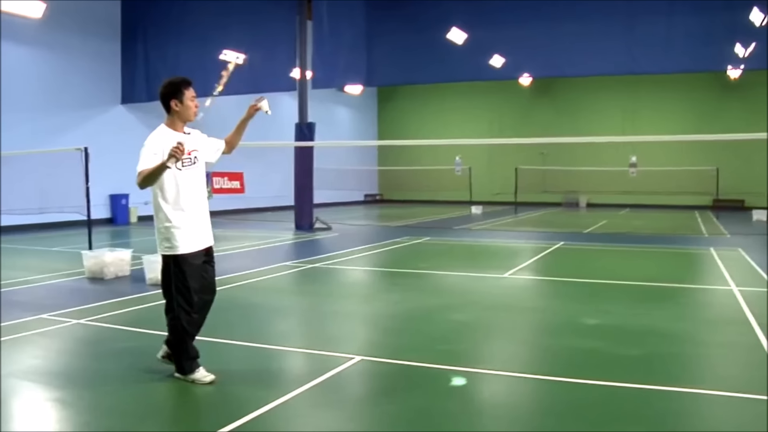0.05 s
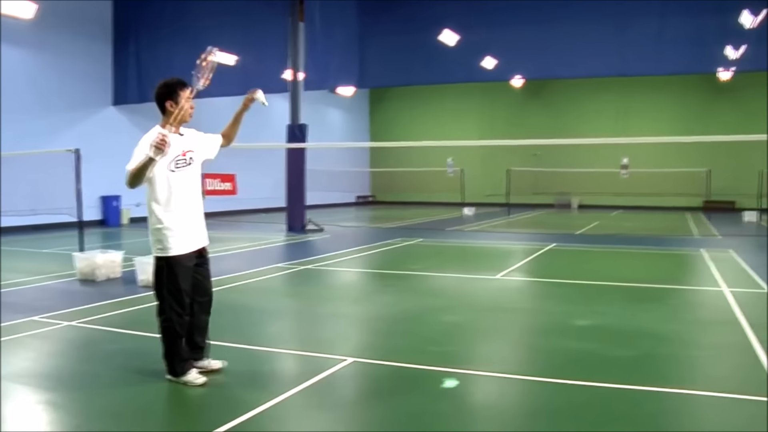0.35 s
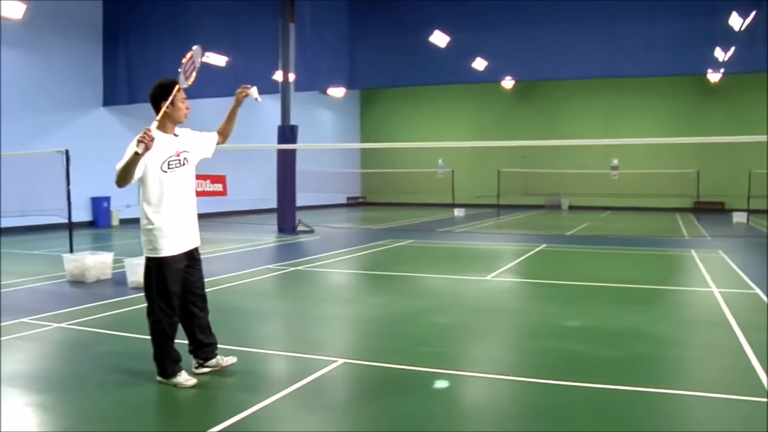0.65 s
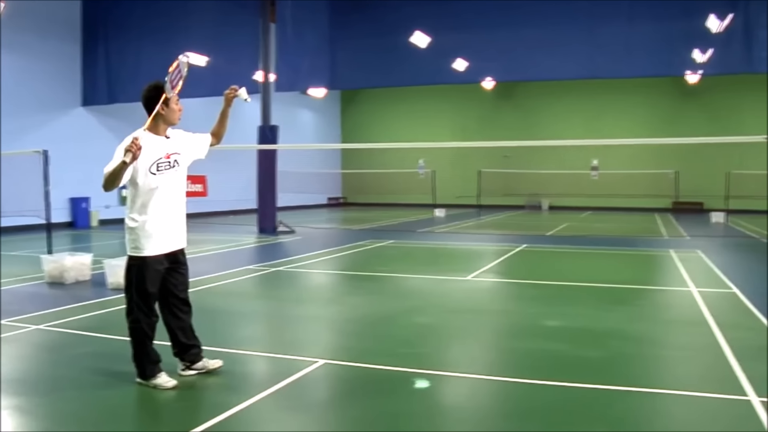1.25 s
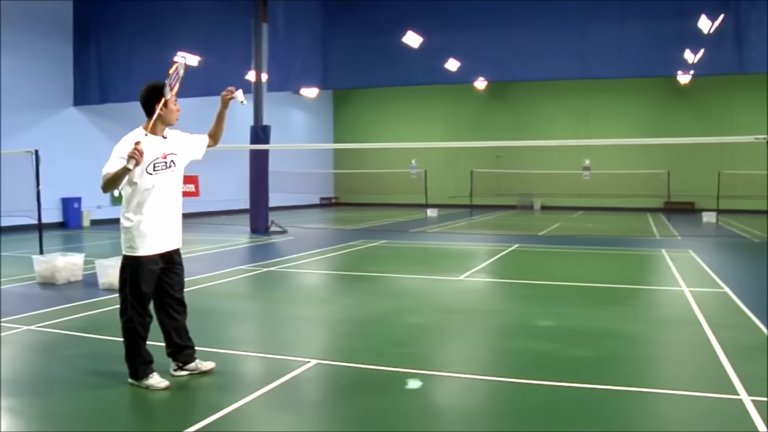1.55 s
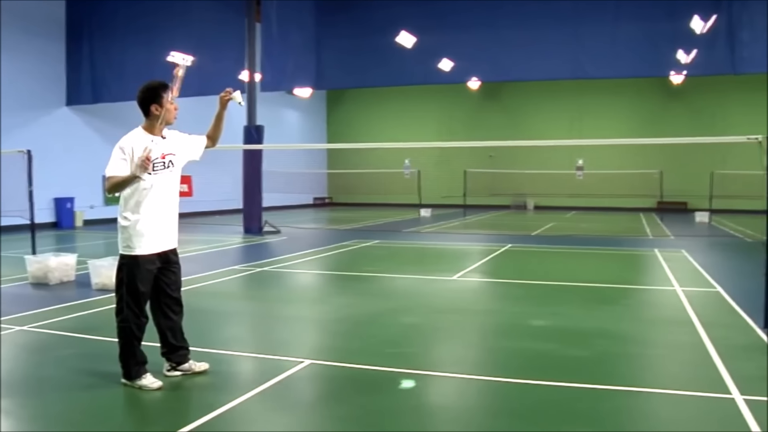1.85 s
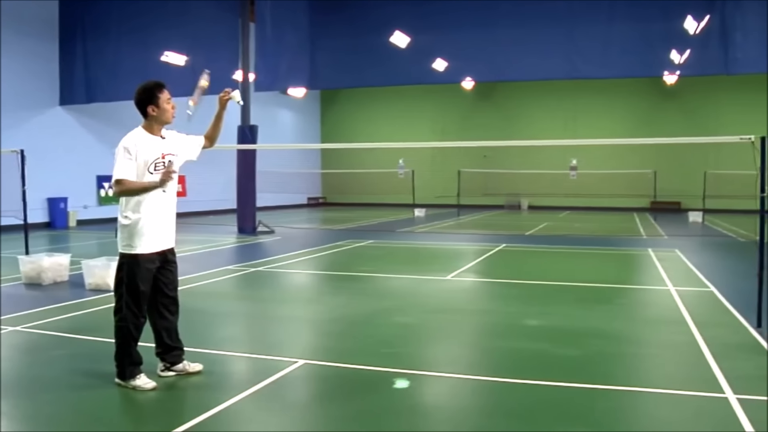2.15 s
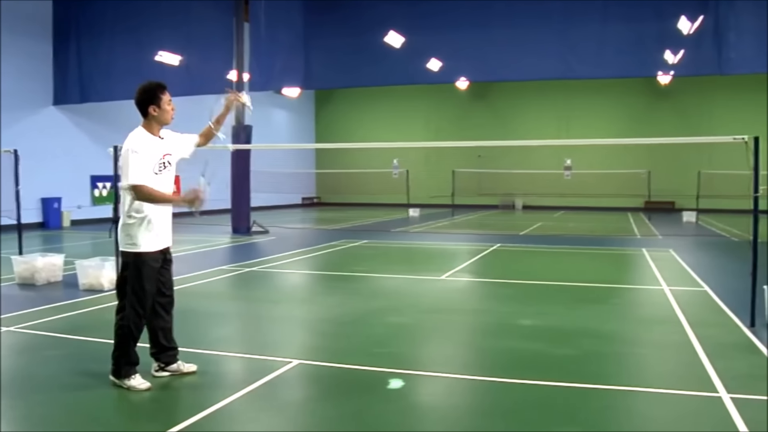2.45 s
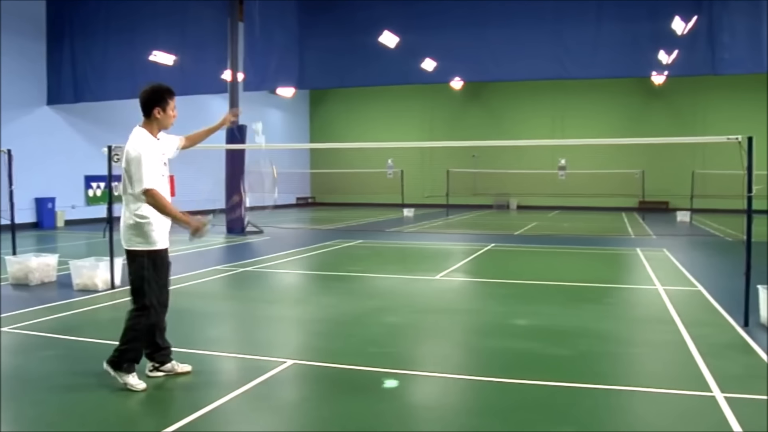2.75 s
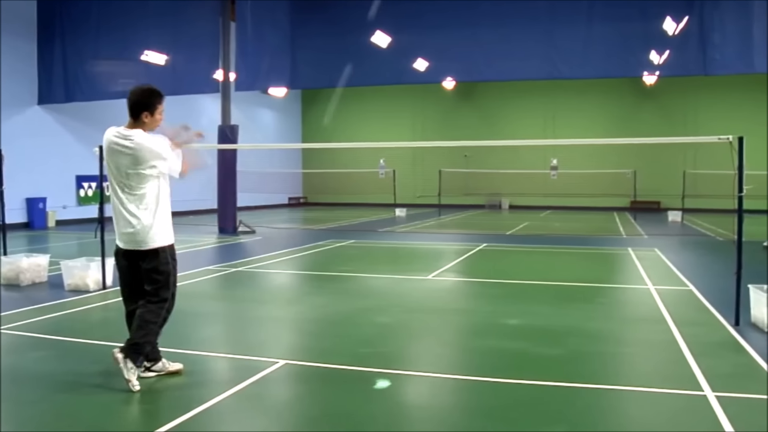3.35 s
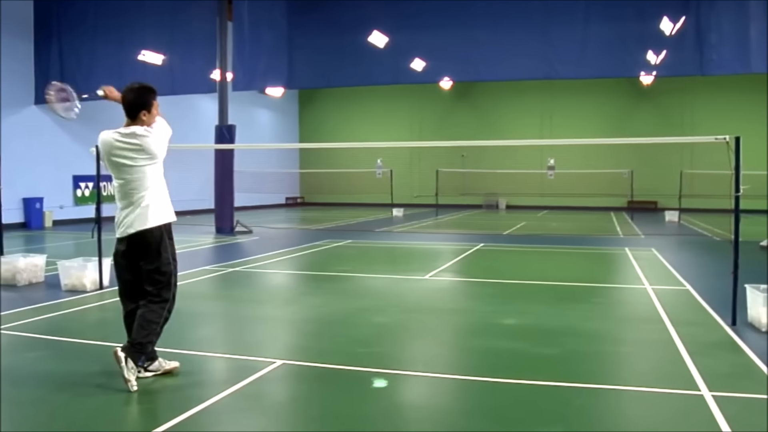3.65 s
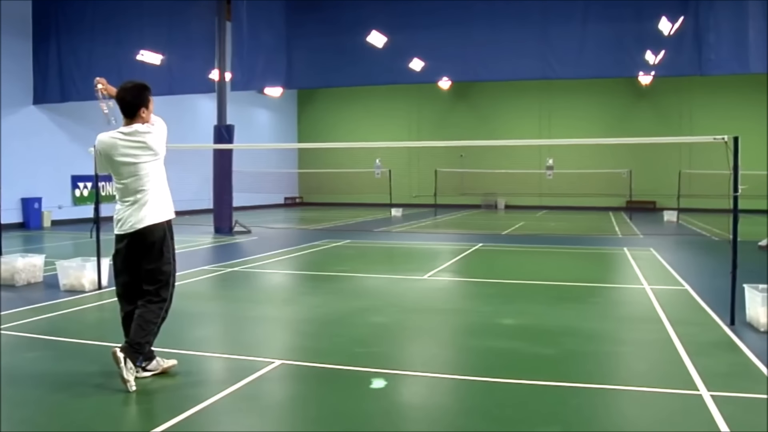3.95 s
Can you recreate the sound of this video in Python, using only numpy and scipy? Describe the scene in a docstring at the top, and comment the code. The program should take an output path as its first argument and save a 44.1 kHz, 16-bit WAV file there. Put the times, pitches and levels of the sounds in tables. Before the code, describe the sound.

A badminton smash cracks sharply and echoes through a large sports hall.

```python
"""A badminton smash in a large sports hall: cork cracks on the string bed, which rings and thumps.
The racket whooshes into the hit; floor and walls return it as slaps and a long, darkening tail.
Before it, soles scuff and tap and clothes rustle, among faint high chirps and ticks.
Ventilation rumbles throughout, under a wash of hall noise that slowly fades."""
import sys
import numpy as np
from scipy import signal
from scipy.fft import rfft, irfft
from scipy.io import wavfile
from scipy.ndimage import uniform_filter1d

SR = 44100
rng = np.random.default_rng(int(sys.argv[2]) if len(sys.argv) > 2 else 0)


def transcribe(u):
    """Save the signal u as a 16-bit wav file named by the first command-line argument.

    u: samples, shape (n,) or (channels, n), limited to [-1, 1]; the rate is SR.
    q: integer samples, one column per channel.
    """
    v = np.clip(np.atleast_2d(u).T, -1, 1)
    q = np.round(v * 32767).astype(np.int16)
    wavfile.write(sys.argv[1], SR, q)


N = 176400
TIME_S, BIN_HZ = np.arange(N) / SR, np.fft.rfftfreq(N, 1 / SR)
HIT_S = 3.3495


def amp(db):
    """Decibels to gain."""
    return 10 ** (np.asarray(db) / 20)


def unit_rms(x):
    """Scale to an rms of one."""
    return x / np.sqrt(np.mean(x ** 2) + 1e-20)


def lookup(table, hz):
    """Interpolate on a log-frequency axis."""
    freq_hz, value = np.transpose(table)
    return np.interp(np.log(hz + 1), np.log(freq_hz + 1), value)


def noise(spectrum):
    """Steady coloured noise, unit rms."""
    return unit_rms(irfft(rfft(rng.standard_normal(N)) * amp(lookup(spectrum, BIN_HZ)), N))


def band(hz, width_hz):
    """Noise in one Gaussian resonance, unit rms."""
    resonance = np.exp(-.5 * ((BIN_HZ - hz) / width_hz) ** 2)
    return unit_rms(irfft(rfft(rng.standard_normal(N)) * resonance, N))


def drift(shape, size):
    """Smooth random motion along the last axis, unit rms."""
    return unit_rms(uniform_filter1d(uniform_filter1d(rng.standard_normal(shape), size), size))


def since(start_s):
    """Seconds after start_s, zero before."""
    return np.maximum(TIME_S - start_s, 0)


def ramp(start_s, length_s):
    """Linear rise from 0 to 1, then held."""
    return np.minimum(since(start_s) / length_s, 1)


def arches(events):
    """Envelope with one rounded swell per event."""
    return sum(amp(db) * np.sqrt(abs(np.sin(np.pi * ramp(start_s, length_s))))
               for start_s, length_s, db in events)


def delayed(x, delay_s):
    """Shift later, keeping the length."""
    return np.pad(x, (round(delay_s * SR), 0))[:N]


def tint(x, spectrum):
    """Impose a magnitude spectrum, keep the phase; unit energy."""
    phase = np.angle(rfft(x))
    tinted = irfft(np.exp(1j * phase) * amp(lookup(spectrum, BIN_HZ)), N)
    return tinted / np.linalg.norm(tinted)


# Ventilation rumble: freq_hz, gain_db
VENT_SPECTRUM = [(12, -5), (30, -6.5), (42, 3), (62, 1), (85, 0), (115, 1), (165, -1.5), (220, -1),
                 (290, -8.5), (400, -10.5), (600, -21), (850, -17.5), (1300, -37.5), (2000, -38),
                 (4000, -42.5), (7000, -48), (10300, -49), (11300, -65), (15500, -75)]
def ventilation(level_db=-43, flutter_db=0.6):
    """Air rumbles, wavering slightly in patches of time and frequency."""
    _, _, frames = signal.stft(noise(VENT_SPECTRUM), SR, nperseg=2048)
    patches = unit_rms(uniform_filter1d(drift(frames.shape, size=10), size=6, axis=0))
    _, rumble = signal.istft(frames * amp(flutter_db * patches), SR, nperseg=2048)
    return amp(level_db) * unit_rms(rumble[:N])


# Low-mid room noise contour: time_s, level_db
SWELL_CONTOUR = [(0, -43), (.55, -44), (1.05, -45), (1.35, -46.5), (1.8, -50), (2.4, -55.5), (2.851, -48),
                 (3.3, -53)]
# Low-mid room noise: freq_hz, gain_db
SWELL_SPECTRUM = [(60, 1), (150, -5.5), (280, 8), (350, 1), (450, -13.5), (700, -8), (1100, -23.5),
                  (2500, -63)]
# Lingering hall noise: freq_hz, gain_db
WASH_SPECTRUM = [(100, 3), (400, 5), (750, -3.5), (1150, 1.5), (1800, -10.5), (2600, -26.5), (3800, -20.5),
                 (6000, -44), (11000, -47)]
def hall_noise(wash_db=-54, fade_db_per_s=3):
    """Low-mid noise sinks and swells while a broader wash fades."""
    swell = amp(np.interp(TIME_S, *np.transpose(SWELL_CONTOUR))) * noise(SWELL_SPECTRUM)
    wash = amp(wash_db - fade_db_per_s * TIME_S) * noise(WASH_SPECTRUM)
    return swell + wash


# Duct hum: pitch_hz, width_hz, level_db
DUCT_DRONES = [(29, 3.3, -54), (112.6, 2.6, -56.5), (148.6, 1.55, -55.5), (220.5, 6.3, -51),
               (918, 9.9, -72)]
def ducts():
    """Air ducts hum in narrow, wavering bands."""
    return sum(amp(db) * band(hz, width_hz) for hz, width_hz, db in DUCT_DRONES)


WALLS_S = 0.093
# Hall decay: freq_hz, t60_s
HALL_DECAY = [(100, 2.5), (500, 7.2), (1300, 3.94), (3000, 2.62), (5000, 1.43), (8000, 0.86), (10500, 0.85),
              (12000, 2.2), (15000, 2.5)]
def hall_response(spectrum, early_db=-7.5, build_s=0.013):
    """Weak early scatter, then the full tail once the walls answer; unit energy."""
    hz, t, frames = signal.stft(noise(spectrum), SR, nperseg=512)
    decay = amp(-60 * t / lookup(HALL_DECAY, hz)[:, None])
    _, tail = signal.istft(frames * decay, SR, nperseg=512)
    early = amp(early_db) * ramp(0, build_s)
    late = (1 - amp(early_db)) * ramp(WALLS_S, build_s)
    response = tail[:N] * (early + late)
    return response / np.linalg.norm(response)


# Hall reverberation: freq_hz, gain_db
REVERB_SPECTRUM = [(100, 10.5), (1000, -4), (4000, 0.5), (12000, -5)]
def reverb(send):
    """The hall prolongs and colours the sound sent into it."""
    return signal.fftconvolve(send, hall_response(REVERB_SPECTRUM))[:N]


# Clothing strokes: start_s, length_s, level_db
CLOTH_STROKES = [(0, 0.064, -64.5), (.08, 0.14, -70), (0.213, 0.18, -75), (0.567, 0.17, -69)]
# Cloth friction: freq_hz, gain_db
CLOTH_SPECTRUM = [(500, -15), (2000, -7), (3000, 1), (4200, 3), (5600, -10), (7800, -2), (10200, -14),
                  (11300, -30)]
def rustle(grain_db=4):
    """Cloth brushes cloth in short, crinkly swells."""
    friction = noise(CLOTH_SPECTRUM) * amp(grain_db * drift(N, size=160))
    return arches(CLOTH_STROKES) * unit_rms(friction)


# Shoe scuffs: start_s, length_s, level_db
SOLE_SCUFFS = [(0.464, 0.09, -63.5), (0.53, 0.24, -71.5), (0.748, .04, -64), (0.89, 0.037, -72),
               (2.557, 0.16, -72.5), (3.083, 0.11, -69.5), (3.174, 0.16, -72)]
# Sole friction: freq_hz, gain_db
SCUFF_SPECTRUM = [(200, -16), (1500, 6), (3200, 8), (4400, 8.5), (5600, 4), (7500, 8), (10000, -2),
                  (11300, -24), (15000, -26)]
def scuffs(grain_db=4.5):
    """Soles rub the court in short, grainy swells."""
    friction = noise(SCUFF_SPECTRUM) * amp(grain_db * drift(N, size=45))
    return arches(SOLE_SCUFFS) * unit_rms(friction)


# Light footfalls: start_s, level_db
FOOT_TAPS = [(1.294, -41), (1.329, -54), (1.359, -46.5), (1.429, -55.5)]
# Footfall knock: freq_hz, gain_db
TAP_SPECTRUM = [(100, -7), (450, 9.5), (750, 11.5), (1500, -7), (2400, -15), (3300, -22), (4400, -24),
                (7000, -23), (11000, -51)]
def taps(rise_s=0.001, t60_s=0.036):
    """Feet land with soft knocks that die at once."""
    envelope = sum(ramp(start_s, rise_s) * amp(db - 60 * since(start_s) / t60_s)
                   for start_s, db in FOOT_TAPS)
    return envelope * noise(TAP_SPECTRUM)


# Faint high chirps: start_s, length_s, pitch_hz, width_hz, level_db
FAINT_CHIRPS = [(1.286, 0.02, 3220, 260, -54.5), (1.315, .055, 3670, 480, -68),
                (1.415, 0.035, 3950, 330, -67), (1.968, 0.1, 2700, 520, -69)]
def faint_chirps(octave_db=-12):
    """Faint, brief, rough high chirps with a weak octave."""
    out = np.zeros(N)
    for start_s, length_s, hz, width_hz, db in FAINT_CHIRPS:
        tone = band(hz, width_hz) + amp(octave_db) * band(2 * hz, 2 * width_hz)
        out += amp(db) * np.sin(np.pi * ramp(start_s, length_s)) * tone
    return out


# Stance and grip ticks: start_s, level_db, t60_s
STANCE_TICKS = [(0.492, -57, .025), (.502, -57, .02), (0.5134, -53, .02), (.521, -56.5, 0.017),
                (.5636, -60, .015), (.6763, -61, .012), (.7721, -53, .012), (0.781, -48, 0.022),
                (.7945, -45, 0.011), (0.928, -52, .012)]
# Tick colour: freq_hz, gain_db
TICK_SPECTRUM = [(300, -18), (2200, -13.5), (3400, -1.5), (4400, 0), (5600, -5), (7400, 5), (8600, -5),
                 (9800, -3), (11200, -27), (15000, -24)]
def ticks():
    """Faint, bright ticks as the player shifts stance and grip."""
    envelope = sum((TIME_S > start_s) * amp(db - 60 * since(start_s) / t60_s)
                   for start_s, db, t60_s in STANCE_TICKS)
    return envelope * noise(TICK_SPECTRUM)


# Bands of the high tick: pitch_hz, width_hz, level_db
TICK_BANDS = [(3450, 300, -64), (4350, 490, -60), (7350, 620, -57.5), (9500, 420, -61.5)]
def high_tick(peak_s=2.538, spread_s=0.008):
    """A faint, high tick rings briefly in a few bands."""
    envelope = np.exp(-.5 * ((TIME_S - peak_s) / spread_s) ** 2)
    return envelope * sum(amp(db) * band(hz, width_hz) for hz, width_hz, db in TICK_BANDS)


# Smash radiated to all sides: freq_hz, gain_db
TAIL_SPECTRUM = [(60, -3.5), (130, -2.5), (230, 1.5), (350, -1), (440, 1.5), (510, 2.5), (580, -2.5),
                 (740, 0.5), (1000, -5), (1550, -4), (1800, -10.5), (2300, -16), (2750, -16), (3900, -12.5),
                 (5000, -15), (7000, -18), (9500, -24.5), (11200, -44), (15500, -48)]
# Hall resonances: pitch_hz, width_hz, level_db, t60_s
HALL_MODES = [(514, 20, -43.5, 3.6), (2730, 36, -52, 1.1)]
def smash_tail(energy_db=10.5, clump_db=1.5):
    """Echoes of the smash arrive in clumps; a few pitches ring on."""
    echoes = hall_response(TAIL_SPECTRUM) * amp(clump_db * drift(N, size=220))
    rings = sum(amp(db - 60 * since(WALLS_S) / t60_s) * band(hz, width_hz)
                for hz, width_hz, db, t60_s in HALL_MODES)
    tail = amp(energy_db) * echoes / np.linalg.norm(echoes) + ramp(0, WALLS_S) ** 2 * rings
    return delayed(tail, HIT_S)


# Far-wall returns: delay_s, relative_db, t60_s
WALL_RETURNS = [(0.075, -10, 0.18), (0.096, -19.5, 0.12), (.126, -15, 0.049), (0.166, -10.5, 0.11),
                (.262, -16, .05), (0.301, -10, 0.04), (0.464, -20, 0.04)]
# Wall return colour: freq_hz, gain_db
SLAP_SPECTRUM = [(80, 4.5), (250, 0.5), (700, 3), (1500, -4.5), (2200, -15), (3500, -8), (6000, -18.5),
                 (10000, -28), (11500, -58)]
def wall_slaps(gain_db=-15, rise_s=0.0025, air_db_per_s_per_khz=6.5):
    """Walls return the smash as smeared bursts, duller over longer paths."""
    out = np.zeros(N)
    for delay_s, db, t60_s in WALL_RETURNS:
        arrival_s = HIT_S + delay_s
        envelope = ramp(arrival_s, rise_s) * amp(db - 60 * since(arrival_s) / t60_s)
        air_loss = amp(-air_db_per_s_per_khz * delay_s * BIN_HZ / 1000)
        out += irfft(rfft(envelope * noise(SLAP_SPECTRUM)) * air_loss, N)
    return amp(gain_db) * out


# Air rushing past the racket: freq_hz, gain_db
WHOOSH_SPECTRUM = [(100, -24), (400, -2), (900, -16), (1700, -13), (3000, -15), (6000, -22), (10000, -33),
                   (11500, -48)]
def swing(peak_s=3.336, rise_s=0.0366, fall_s=0.035, slow_hz=262, fast_hz=325.4, waver=0.0496,
          shaft_db=-33, whoosh_db=-48):
    """Racket speed sets the loudness of the rushing air and the pitch of the shaft's tone."""
    t = TIME_S - peak_s
    speed = np.exp(-(t / np.where(t < 0, rise_s, fall_s)) ** 2)
    pitch_hz = (slow_hz + (fast_hz - slow_hz) * speed) * (1 + waver * drift(N, size=300))
    shaft_tone = np.sin(2 * np.pi * np.cumsum(pitch_hz) / SR)
    return speed * (amp(shaft_db) * shaft_tone + amp(whoosh_db) * noise(WHOOSH_SPECTRUM))


# String bed and frame modes: pitch_hz, relative_db, t60_s
RACKET_MODES = [(232, -8.5, 0.048), (353, -2.5, 0.047), (474, -2, 0.073), (586, -8.5, 0.061),
                (791, -7.5, 0.048), (965, -6.5, 0.053), (1335, -21, 0.027), (1572, -10.5, 0.074),
                (1960, -14.5, 0.058), (2137, -20, 0.066), (2434, -21, 0.09), (2710, -14, 0.057),
                (2915, -12, 0.033), (3190, -19, .045), (5800, -17, 0.039)]
def strings(gain_db=-10.5, contact_s=0.0028):
    """The cork pushes the string bed in; strings and frame ring briefly."""
    t = since(HIT_S)
    contact = np.sin(np.pi / 2 * ramp(HIT_S, contact_s)) ** 2
    ring = sum(amp(db - 60 * t / t60_s) * np.sin(2 * np.pi * hz * t) for hz, db, t60_s in RACKET_MODES)
    return amp(gain_db) * contact * ring


def thump(gain_db=-8.5, pitch_hz=470, delay_s=0.005, spread_s=0.001):
    """The string bed springs back and pushes the air for about one cycle."""
    t = TIME_S - HIT_S - delay_s
    envelope = np.exp(-.5 * (t / spread_s) ** 2)
    return amp(gain_db) * envelope * np.sin(2 * np.pi * pitch_hz * t)


# Cork and feather impact: freq_hz, gain_db
CRACK_SPECTRUM = [(60, 4), (150, 1), (500, 5), (800, -0.5), (1100, -1), (1450, 1.5), (2200, -10.5),
                  (2900, -3.5), (3700, -14.5), (4500, -12.5), (6000, -14.5), (7700, -16), (8600, -21.5),
                  (10300, -24.5), (11300, -43), (15500, -40)]
def crack(gain_db=-14.8, rise_s=0.0009, hold_s=0.0044, t60_s=0.026):
    """Cork and feathers snap against the strings in a dense burst of a few milliseconds."""
    envelope = ramp(HIT_S, rise_s) * amp(-60 * since(HIT_S + hold_s) / t60_s)
    snap = tint(rng.standard_normal(N) * envelope, CRACK_SPECTRUM)
    for _ in range(4):  # keeps the burst short as well as coloured
        snap = tint(snap * envelope ** .2, CRACK_SPECTRUM)
    return amp(gain_db) * np.linalg.norm(envelope) * snap * (TIME_S > HIT_S)


def scene(floor_db=-7, floor_delay_s=0.0078):
    """Background, footwork and smash with its floor bounce and hall echoes; mono."""
    background = ventilation() + hall_noise() + ducts()
    racket = strings() + swing()
    friction = scuffs() + rustle()
    knocks, chirps = taps(), faint_chirps()
    smash = racket + thump() + crack()
    floor_bounce = amp(floor_db) * delayed(thump() + crack(), floor_delay_s)
    send = amp(-12) * (racket + friction) + knocks + amp(-1.5) * chirps
    hall = reverb(send) + smash_tail() + wall_slaps()
    lead_in = friction + knocks + chirps + ticks() + high_tick()
    return (background + hall + lead_in + floor_bounce + smash)[None]


def record(dry, cutoff_hz=15800):
    """Steep low-pass on the top treble."""
    lowpass = signal.firwin(511, cutoff_hz, window=("kaiser", 9), fs=SR)
    return signal.oaconvolve(dry, lowpass[None], "same")


dry = scene()
out = record(dry)
transcribe(out)
```